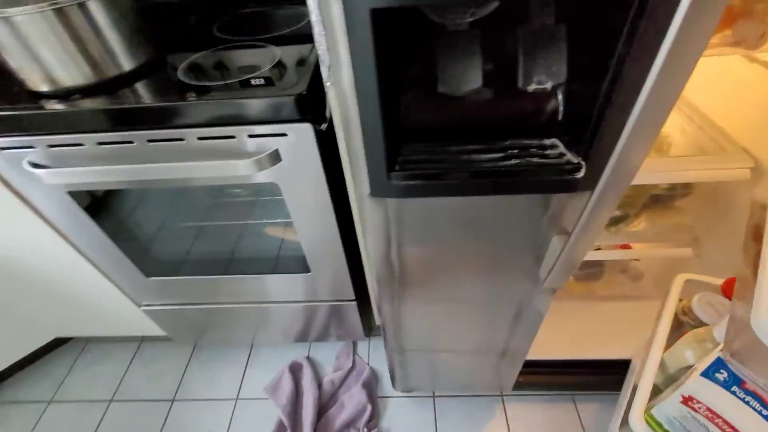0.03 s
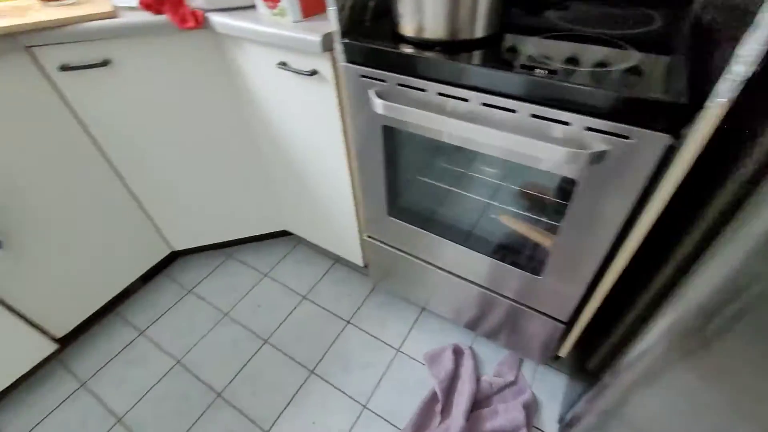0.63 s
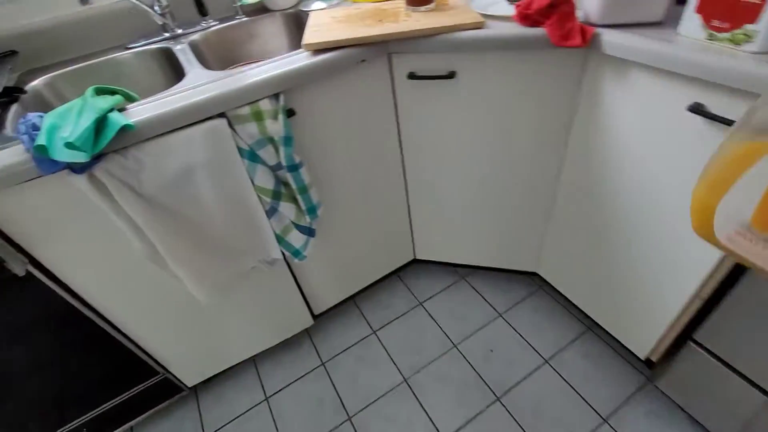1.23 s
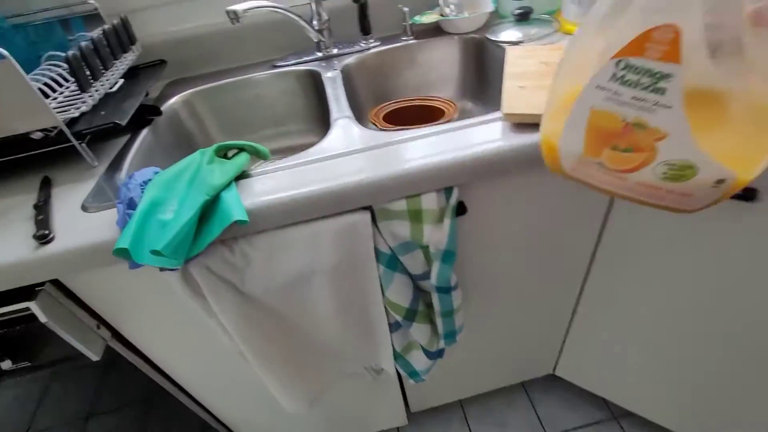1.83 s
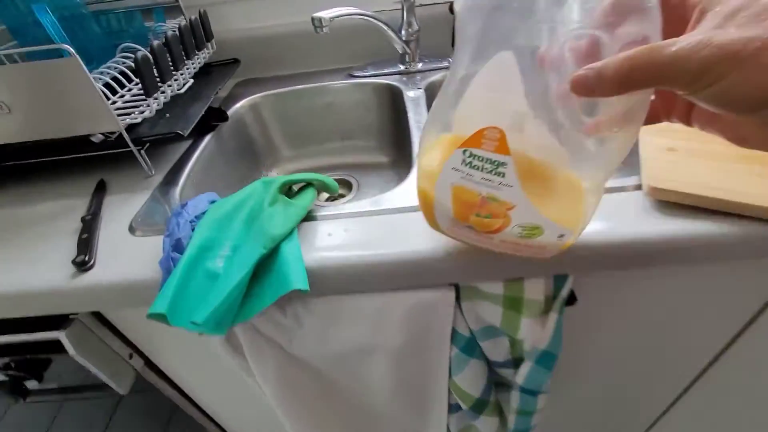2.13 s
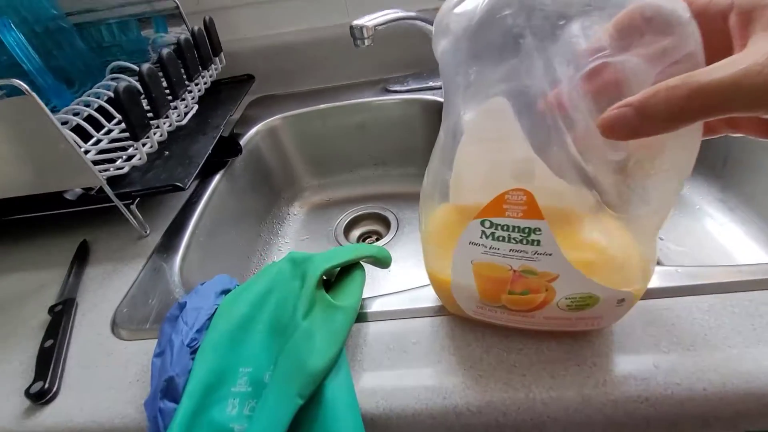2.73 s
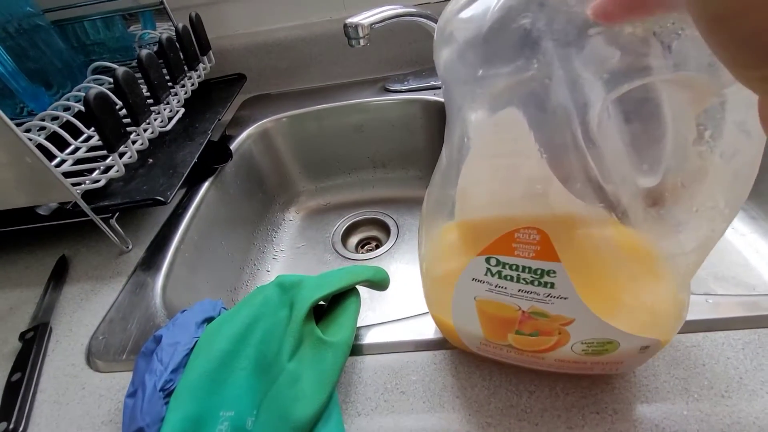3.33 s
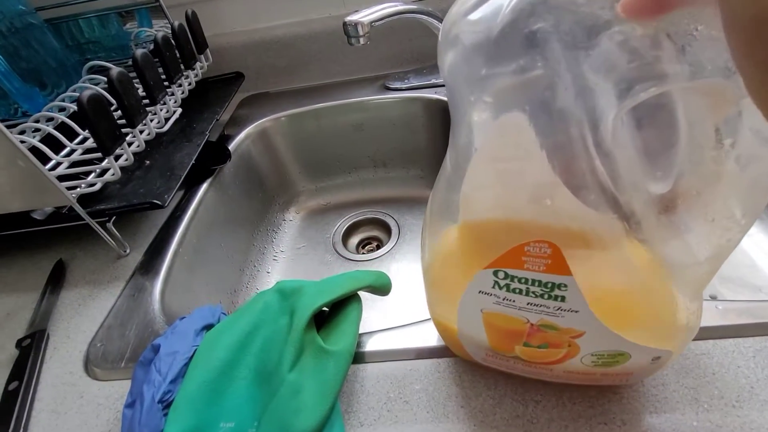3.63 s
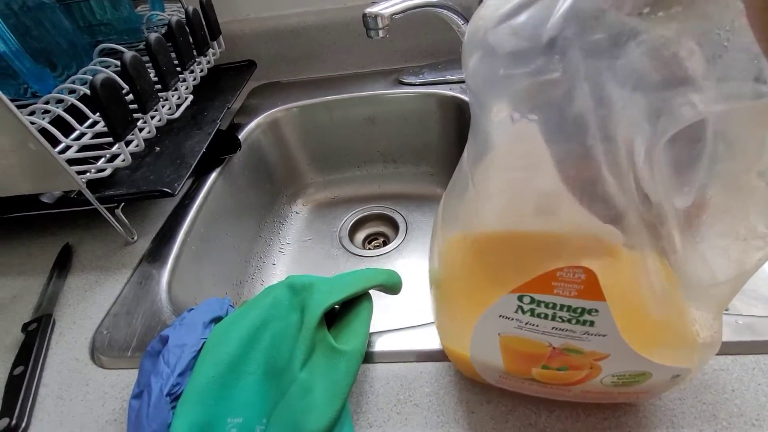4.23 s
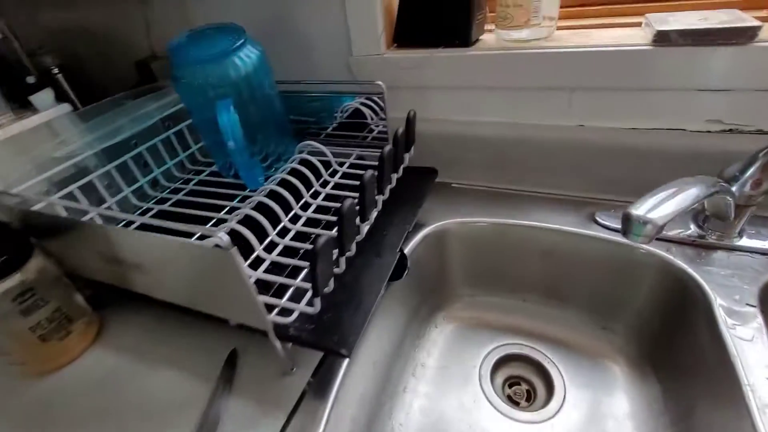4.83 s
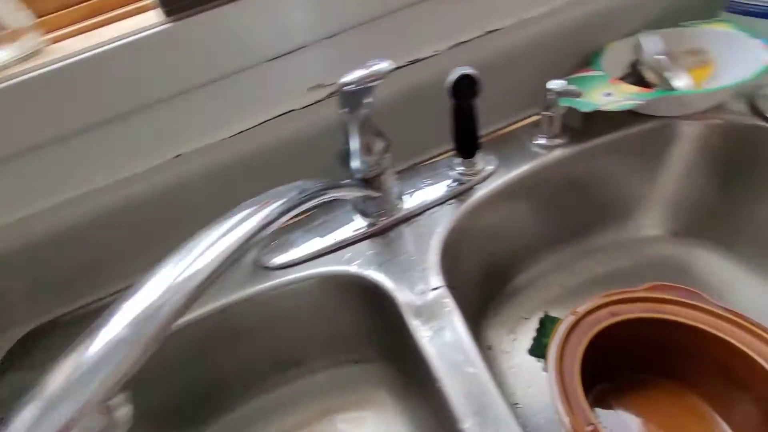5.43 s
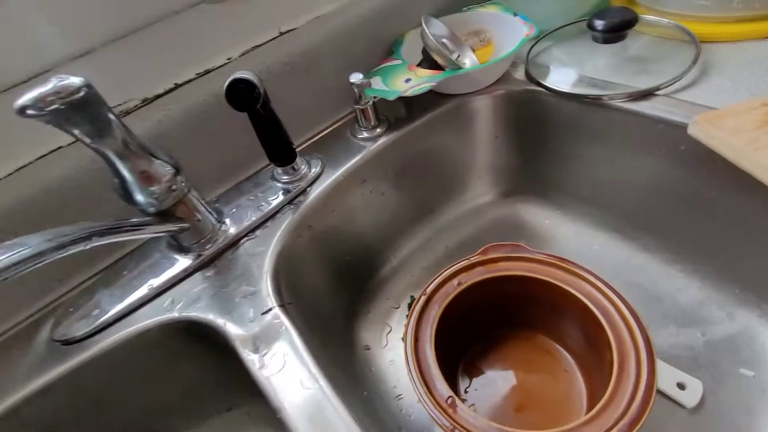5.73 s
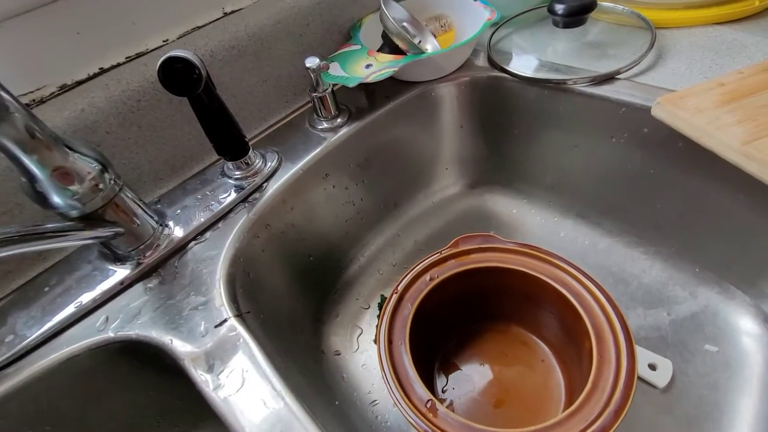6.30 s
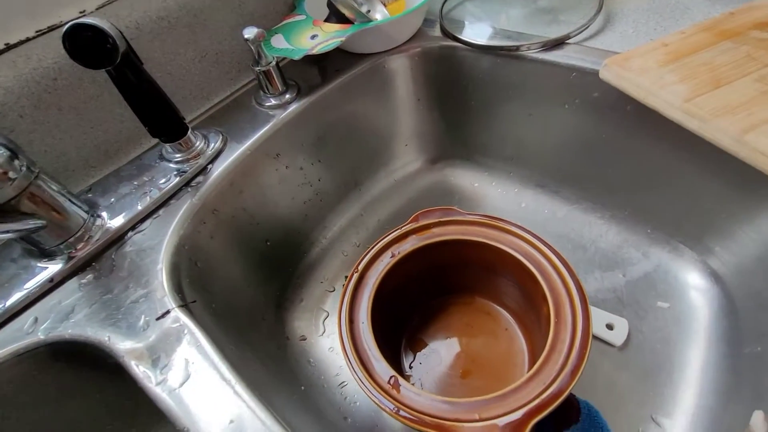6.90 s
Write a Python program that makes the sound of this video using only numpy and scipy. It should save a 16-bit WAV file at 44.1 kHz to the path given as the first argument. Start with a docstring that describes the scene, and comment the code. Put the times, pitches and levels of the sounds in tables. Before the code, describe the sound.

A refrigerator door thumps shut, then a plastic juice jug knocks hollowly onto a counter and a tap clunks aside.

```python
"""A faint hum and hiss fill a small tiled kitchen. Glass clinks in a moving refrigerator door, which
lands on its seal at 1.1 s: the cabinet booms and the shelves rattle on. From 1.7 s a plastic jug of
juice is carried to the sink, set down, slid and rocked, its walls ringing. From 4.7 s the tap is swung
aside and something light clacks. Each knock leaves things shaking. At 7 s the hand-held camera is
bumped and its shell rings hollow."""
import sys
import numpy as np
from scipy import signal
from scipy.fft import rfft, irfft, next_fast_len
from scipy.io import wavfile
from scipy.ndimage import map_coordinates

SR = 44100
rng = np.random.default_rng(int(sys.argv[2]) if len(sys.argv) > 2 else 0)


def to_wav(sig):
    """Store sig (one row per channel, or 1-D mono) as 16-bit WAV at the path in sys.argv[1].

    Samples outside -1..1 are clipped; the rate is SR.
    """
    pcm = np.clip(np.atleast_2d(sig), -1, 1) * 32767
    pcm = np.round(pcm).astype(np.int16)
    wavfile.write(sys.argv[1], SR, pcm.T)  # frames by channels


N = 311346
T = np.arange(SR // 2) / SR  # time within one event, s


def amp(db):
    """Decibels to gain."""
    return 10 ** (np.asarray(db) / 20)


def unit(x, size=None):
    """Scale to rms 1 over the first size samples."""
    return x / np.sqrt(np.mean(x[..., :size] ** 2) + 1e-20)


def along(points, hz):
    """Interpolate (Hz, value) points on a log axis."""
    point_hz, values = np.transpose(points)
    return np.interp(np.log(hz + 1), np.log(point_hz), values)


def curve(points):
    """Join (s, value) points with straight lines."""
    return np.interp(np.arange(N) / SR, *np.transpose(points))


def decay(t60_s):
    """Exponential fall, 60 dB in t60_s."""
    return np.exp(-np.log(1000) * T / t60_s)


def stroke(rise_s, t60_s):
    """Linear rise, then exponential fall."""
    return np.minimum(T / rise_s, 1) * np.exp(-np.log(1000) * np.maximum(T - rise_s, 0) / t60_s)


def sine(hz):
    """Sine tone, one event long."""
    return np.sin(2 * np.pi * hz * T)


def wobble(rate_hz, size=N):
    """Smooth random curve, rate_hz knots a second."""
    knots = rng.standard_normal(int(size * rate_hz / SR) + 4)
    return map_coordinates(knots, [np.arange(size) * rate_hz / SR])


# Each row: frequency in Hz, left-right correlation.
COHERENCE = [(100, 0.85), (300, 0.98), (600, 0.53), (1300, 0.76), (3000, 0.017), (10000, 0)]
def noise(spectrum, size=len(T), tilt_db_oct=0):
    """Coloured stereo noise of rms 1; the channels are alike in the bass, independent in the treble."""
    n_fft = next_fast_len(size)
    hz = np.fft.rfftfreq(n_fft, 1 / SR)
    angle = np.arccos(np.clip(along(COHERENCE, hz), -1, 1)) / 2
    gain = amp(along(spectrum, hz) + tilt_db_oct * np.log2(hz + 1))
    white = rfft(rng.standard_normal((2, n_fft)))
    mid, side = irfft(white * gain * [np.cos(angle), np.sin(angle)], n_fft)[:, :size]
    return unit(np.array([mid + side, mid - side]))


def ring(modes, scatter_db, detune):
    """Damped modes, with random scatter of strength and pitch at each strike."""
    hz, db, t60_s = np.transpose(modes)[:, :, None]
    strength, pitch = rng.standard_normal((2, len(modes), 1))
    sign = (-1) ** np.arange(len(modes))[:, None]
    return np.sum(sign * amp(db + scatter_db * strength) * decay(t60_s) * sine(hz * (1 + detune * pitch)), 0)


def add(out, start_s, sound, lag_ms=0, pan_db=0):
    """Mix in an event; lag_ms and pan_db are left minus right."""
    for channel, x, side in zip(out, np.broadcast_to(sound, (2, len(T))), (.5, -.5)):
        start = int(np.clip(round((start_s + side * lag_ms / 1000) * SR), 0, N - 1))
        channel[start:start + len(T)] += amp(side * pan_db) * x[:N - start]


def knocks(rows, modes, spectrum, noise_db, t60_s, tick_t60_s, trim_db, lag_ms, rise_s):
    """Contacts ring a body in four bands: weight sets the thump, hardness the clack and the tick."""
    out = np.zeros((2, N))
    bands = [(3, (52, 190)), (4, (180, 700)), (4, (700, 2200)), (6, (2200, 16000))]
    filters = [signal.butter(order, hz, 'bandpass', fs=SR, output='sos') for order, hz in bands]
    band_t60_s = [.9 * t60_s, .85 * t60_s, .65 * t60_s, tick_t60_s]
    for start_s, level_db, weight_db, hard_db, *_ in rows:
        tone = unit(ring(modes, scatter_db=1.5, detune=0.018) * decay(2.5 * t60_s), size=SR // 40)
        burst = amp(noise_db) * noise(spectrum)
        parts = [signal.sosfilt(sos, tone + burst * decay(t60)) for sos, t60 in zip(filters, band_t60_s)]
        band_db = np.add([weight_db, 0, hard_db, 0.77 * hard_db], trim_db)  # thump, body, clack, tick
        blow = sum(amp(db) * unit(x, size=SR // 40) for x, db in zip(parts, band_db))
        add(out, start_s, amp(level_db) * blow * (1 - decay(rise_s)), lag_ms)
    return out


# Each row: frequency in Hz, reverberation t60 in seconds.
ROOM_T60 = [(60, 0.39), (250, 0.47), (1000, 0.19), (4000, 0.32), (8000, 0.097), (15000, 0.033)]
def kitchen(dry, wet_db):
    """Tiles and cupboards reflect the sound, each frequency dying at its own rate."""
    hz, t, frames = signal.stft(noise([(60, -11), (250, -5), (16000, 7.5)]), SR, nperseg=256)
    fade = np.exp(-np.log(1000) * t / along(ROOM_T60, hz)[:, None])
    tail = signal.istft(frames * fade, SR, nperseg=256)[1]
    tail = np.pad(tail / np.linalg.norm(tail[0]), ((0, 0), (SR // 250, 0)))  # 4 ms pre-delay
    return dry + amp(wet_db) * signal.fftconvolve(dry, tail, axes=1)[:, :N]


# Each row: frequency in Hz, noise density in dB.
HUM_SPECTRUM = [(15, -43), (25, -18), (80, -19), (206, 5), (249, 4), (394, -22.5), (936, -20.5),
                (2160, -32), (2410, -31), (2760, -26.5), (3520, -33), (4870, -30.5), (6560, -25.5),
                (9320, -28), (16000, -26)]
def background():
    """Low appliance hum and a narrow band of high hiss."""
    hiss = noise([(3000, -37), (4200, -11), (4700, -5.5), (5200, -12.5), (6500, -29)], size=N)
    return amp(-73 + .6 * wobble(6.4)) * noise(HUM_SPECTRUM, size=N) + amp(-82) * hiss


# Each row: start in seconds, frequency in Hz, relative level in dB.
ARM_SWINGS = [(1.649, 43, -31), (4.86, 63.6, -50), (5.433, 60.8, -30.5), (5.642, 48, -54),
              (6.661, 62.5, -48.5)]
def lurches():
    """A swing of the arm heaves the air at the camera for a few slow cycles."""
    out = np.zeros((2, N))
    for start_s, hz, db in ARM_SWINGS:
        add(out, start_s, amp(db - 3.5) * sine(hz) * stroke(rise_s=0.023, t60_s=0.3), lag_ms=.2)
    return out


def shaking(rows):
    """Envelopes of the shaking after knocks: rumble follows their bass, stirring their level."""
    power = np.zeros((2, N))
    for start_s, db, weight_db, *_ in rows:
        rumble = amp(db + weight_db - 16.5) * stroke(rise_s=0.014, t60_s=.4)
        stir = amp(db - 16.5) * stroke(rise_s=0.014, t60_s=0.12)
        add(power, start_s, np.array([rumble, stir]) ** 2)
    return np.sqrt(power)


# Noises of moving about. Each row: frequency in Hz, density in dB.
RUMBLE_SPECTRUM = [(10, -33.5), (30, -11.5), (60, 8), (130, 13.5), (200, -1), (300, -36)]
SLOSH_SPECTRUM = [(130, -24.5), (230, 2), (320, 1.5), (480, -4.5), (750, -15.5), (1200, -12.5), (2000, -28),
                  (4000, -49.5)]
RUSTLE_SPECTRUM = [(700, 5), (1500, -4), (3000, -10), (7000, -7.5), (10000, -15), (16000, -16.5)]
# Each row: time in seconds, relative level in dB.
RUMBLE_LEVELS = [(0.0, -82.5), (0.84, -78), (1.16, -55), (2.04, -82), (2.63, -50), (2.79, -71.5),
                 (3.78, -72.5), (4.11, -52.5), (4.36, -74.5), (5.23, -66), (5.39, -49.5), (5.74, -60),
                 (6.49, -66.5), (7.06, -54.5)]
STIR_LEVELS = [(0.0, -77.5), (0.8, -75), (1.16, -33.5), (1.59, -54), (1.79, -50), (2.24, -64.5),
               (2.69, -62.5), (2.83, -69), (3.03, -68.5), (3.56, -62.5), (4.15, -62), (4.36, -68),
               (5.21, -66.5), (5.35, -53.5), (5.58, -70.5), (5.92, -51.5), (6.33, -80.5), (7.06, -63)]
# Each row: start in seconds, level in dB, length in seconds.
ARM_RUSTLES = [(0.73, -72, 0.2), (1.66, -67.5, 0.23), (2.2, -73.5, 0.4), (4.48, -68, 0.38),
               (4.91, -66, 0.162), (5.64, -69.5, 0.487), (6.66, -72.5, 0.23)]
def handling(knock_rows):
    """Moving about: the camera rumbles, juice and shelves stir, arm and grip rustle."""
    rumble_shake, stir_shake = shaking(knock_rows)
    rumble_gain = np.hypot(amp(curve(RUMBLE_LEVELS) + 1), rumble_shake)
    rumble = rumble_gain * amp(1.8 * wobble(32)) * noise(RUMBLE_SPECTRUM, size=N)
    stir_db = curve(STIR_LEVELS) - 2.5
    slosh = np.hypot(amp(stir_db), stir_shake) * amp(2.6 * wobble(30)) * noise(SLOSH_SPECTRUM, size=N)
    rustle_db = np.minimum(stir_db, -58.5) - 20
    rustle = amp(rustle_db + 1.3 * wobble(20)) * noise(RUSTLE_SPECTRUM, size=N)
    for start_s, db, length_s in ARM_RUSTLES:
        arch = np.sin(np.pi * np.minimum(T / length_s, 1))
        add(rustle, start_s, amp(db + 2 * wobble(86, size=len(T))) * arch * noise(RUSTLE_SPECTRUM))
    left, right = rumble + slosh + rustle
    return np.array([np.roll(left, round(.3 * SR / 1000)), right])  # left lags 0.3 ms


# Each row: frequency in Hz, noise density in dB.
SCRAPE_SPECTRUM = [(180, -52), (300, -11.5), (372, -49), (593, -0.5), (870, -14), (946, -5), (1530, -13.5),
                   (4160, -14.5), (4520, -16.5), (15200, -31), (16000, -31)]
# Each row: start in seconds, level in dB, rise and t60 in seconds, tilt in dB per octave.
SLIDING_CONTACTS = [(0.086, -63, .035, 0.19, 1), (2.149, -50, 0.002, 0.41, 7.5),
                    (2.768, -43, 0.033, 0.31, 0), (4.722, -59, 0.048, 0.21, -2),
                    (5.239, -51, 0.0275, 0.26, 1), (6.731, -73.5, 0.053, 0.25, 8),
                    (6.929, -62, 0.058, 0.44, 6.5)]
# Each row: start in seconds, level in dB, rise and t60 in seconds.
SOFT_MOVES = [(0.469, -56, 0.028, 0.14), (0.821, -53.5, .06, 0.27), (1.02, -41.5, .06, .3),
              (1.389, -46.5, 0.034, 0.2), (4.321, -56.5, 0.037, 0.22), (4.658, -54.5, 0.045, .22),
              (5.149, -48.5, 0.071, 0.29), (6.02, -59, 0.06, 0.63), (6.68, -67.5, .08, .5)]
def rubs():
    """Sliding contacts catch and slip in fine grains; softer movements only swell."""
    out = np.zeros((2, N))
    for start_s, db, rise_s, t60_s, tilt_db_oct in SLIDING_CONTACTS:
        grain = unit(amp(4.7 * wobble(500, size=len(T))))
        scrape = noise(SCRAPE_SPECTRUM, tilt_db_oct=tilt_db_oct)
        add(out, start_s, amp(db) * stroke(rise_s, t60_s) * grain * scrape)
    for start_s, db, rise_s, t60_s in SOFT_MOVES:
        add(out, start_s, amp(db) * stroke(rise_s, t60_s) * noise(SLOSH_SPECTRUM), lag_ms=0.45)
    return out


# Each row: frequency in Hz, level in dB, t60 in seconds.
CAMERA_MODES = [(120, -9, 0.084), (209, -4, 0.095), (353.3, -1, 0.16), (493, 0, 0.023), (623, -12, 0.03),
                (700, -36, 0.073), (906, -14.5, 0.075)]
def camera_bump():
    """A soft, close blow: one push and pull, then the shell rings and rattles briefly."""
    out = np.zeros((2, N))
    pulse_time = (T - .0046) / .0009
    push_pull = -pulse_time * np.exp(-pulse_time ** 2 / 2)
    add(out, 6.9822, amp(-15.5) * push_pull, lag_ms=.1, pan_db=-8.5)
    hollow = ring(CAMERA_MODES, scatter_db=1, detune=.004)
    add(out, 6.9865, amp(-23) * hollow * decay(0.54), lag_ms=0.24, pan_db=-1.5)
    shell = noise([(300, 3.5), (600, -2), (1050, -4), (1400, -16), (2000, -32), (3000, -54)])
    rattle = shell * (amp(-25.5) * decay(0.017) + amp(-39.5) * decay(0.19)) * (1 - decay(0.019))
    add(out, 6.9835, rattle, lag_ms=0.11, pan_db=-4)
    return out


# Each row: frequency in Hz, level in dB, t60 in seconds.
LIGHT_OBJECT_MODES = [(308, 3, 0.09), (420, -6, 0.09), (675, 5, 0.04), (1015, 0, .06), (1220, -7, 0.06),
                      (1780, -6, 0.032), (2040, -6, 0.02), (2865, -14, .04), (3700, -15, 0.03),
                      (4630, -25, .05), (5160, -25, .05)]
def clack():
    """Something hard and light is knocked right of the sink; it is too small to radiate bass."""
    out = np.zeros((2, N))
    body = amp(-36.5) * ring(LIGHT_OBJECT_MODES, scatter_db=.5, detune=0.002)
    crack = noise(SCRAPE_SPECTRUM) * (amp(-37.5) * decay(0.027) + amp(-54.5) * decay(0.098))
    low_cut = signal.butter(2, 330, 'highpass', fs=SR, output='sos')
    add(out, 4.7938, signal.sosfilt(low_cut, (body + crack) * (1 - decay(0.0012))), lag_ms=0.5, pan_db=-7.5)
    return out


# Contact noise of tap and jug. Each row: frequency in Hz, density in dB.
CONTACT_SPECTRUM = [(40, -14), (250, 3.5), (500, -8), (1100, -12), (2000, -15), (3200, -18), (5000, -19),
                    (8000, -27), (16000, -38)]
# Each row: frequency in Hz, level in dB, t60 in seconds.
SINK_MODES = [(63.4, -2.5, 0.75), (113, -2.5, 0.26), (158.7, -3, 0.62), (238, 2.5, 0.145), (345.8, 0, 0.18),
              (441, -11, 0.75), (726, -15.5, 0.15), (971, -5, 0.088), (1295, -9, 0.2), (1870, -35, .06)]
# Each row: start in seconds, then relative level, bass weight and hardness in dB.
TAP_HITS = [(4.654, -57.5, 4.5, -15), (5.234, -34, 6, 1), (5.257, -37, 6, -13), (5.436, -38.5, 1.5, 7),
            (5.652, -66, 18.5, -13), (5.876, -50, -10.5, -11), (5.91, -47.5, -11, -1)]
def tap_knocks():
    """The tap knocks as it is swung aside and rings the sink."""
    return knocks(TAP_HITS, SINK_MODES, CONTACT_SPECTRUM, noise_db=0.5, t60_s=0.21, tick_t60_s=0.074,
                  trim_db=(-3, -2, -23, -32), lag_ms=0.09, rise_s=0.0086)


# Each row: frequency in Hz, noise density in dB.
TICK_SPECTRUM = [(1500, -46), (4000, -16), (7000, -2), (9000, -9.5), (13000, -2), (16000, 5.5)]
# Each row: start in seconds, relative level in dB.
FLEX_TICKS = [(3.317, -61), (3.4305, -54.5), (3.432, -45.5), (3.471, -60.5), (3.496, -50), (3.547, -61.5),
              (3.5556, -52), (4.189, -52)]
def jug_ticks():
    """The jug's plastic ticks dryly as it flexes."""
    out = np.zeros((2, N))
    for start_s, db in FLEX_TICKS:
        add(out, start_s, amp(db + 7) * noise(TICK_SPECTRUM) * decay(0.0097), pan_db=6)
    return out


# Each row: frequency in Hz, level in dB, t60 in seconds.
JUG_MODES = [(60.5, 6, 0.42), (116.5, 3.5, 0.15), (155, -3, 0.41), (226.5, -2, 0.34), (311.6, 2.5, 0.086),
             (447, -3, 0.29), (606.5, -12, 0.11), (683, -6, 0.043), (1148, -3, 0.045), (1930, -29.5, 0.016),
             (2060, -54, .06)]
# Each row: start in seconds, relative level, bass weight and hardness in dB, wall note in Hz,
# note level against the blow in dB.
JUG_HITS = [(1.675, -42.5, -16, 11, 728, 13), (1.77, -56, 0, 15.5, 283, -11),
            (1.832, -39.5, -20, -8, 380, 4), (2.149, -49, -14, 15, 220, -1.5),
            (2.282, -50, -10, 9.5, 275, 5), (2.425, -32, -0.5, -1.5, 215, -7),
            (2.458, -28.5, -3.5, 4.5, 1160, 1.5), (2.531, -36.5, -1.5, 2, 403, -1.5),
            (2.605, -52.5, -4, -21.5, 232, 13.5), (2.73, -41, 0, -3, 312, -0.5),
            (2.773, -37, -22, -0.5, 828, 2.5), (2.896, -51.5, -17, 0, 339, 13.5),
            (3.018, -51.5, -4, -1, 423, -5), (3.057, -49, -5, -2.5, 216, 5), (3.092, -34, -8, 0, 212, 4),
            (3.111, -31.5, -4, -4.5, 460, -1), (3.139, -40.5, -1.5, -1.5, 115, 3.5),
            (3.315, -50, -2, 3, 331, 6), (3.931, -39, -16, 4, 354, -3.5), (4.022, -37, 2, 0, 227, 0),
            (4.045, -33.5, 1, 2.5, 220.4, -0.5), (4.192, -48, -4.5, 2, 306, 0)]
def jug_knocks():
    """Each knock rings the jug and one wall, whose pitch shifts with the grip and the juice's tilt."""
    out = knocks(JUG_HITS, JUG_MODES, CONTACT_SPECTRUM, noise_db=-1, t60_s=0.24, tick_t60_s=0.106,
                 trim_db=(-1, -4.5, -17.5, -26), lag_ms=0.088, rise_s=0.0099)
    for start_s, db, _, _, hz, note_db in JUG_HITS:
        note = sine(hz) * decay(40 / hz) * (1 - decay(0.0058))  # t60 of 40 cycles
        add(out, start_s, amp(db + note_db) * note)
    return out


def clink():
    """Two glass things brush together in the moving door."""
    out = np.zeros((2, N))
    glass = ring([(5815, 2, 0.11), (7500, -1, 0.047)], scatter_db=4, detune=0)
    add(out, .478, amp(-50.5) * glass * np.minimum(T / 0.014, 1) ** 2)
    return out


# Each row: frequency in Hz, level in dB, t60 in seconds.
FRIDGE_MODES = [(64.6, 1, 0.065), (290, 3.5, 0.13), (338, -15, 0.88), (374, -23, 0.17), (450, -4.5, 0.12),
                (573, -21, 0.37), (665, -28, 0.43), (980, -25, 0.51), (875, -29.5, 0.19),
                (990, -24.5, 0.47), (1020, -15.5, 0.063), (1250, -30, 0.6), (1244, -27, 0.75),
                (1410, -39, 0.4), (1550, -37.5, 0.3), (1830, -31.5, 0.29), (2100, -47.5, 0.57),
                (2110, -40.5, 0.33), (2830, -38, 0.42), (2850, -42, 0.31)]
# Each row: frequency in Hz, noise density in dB.
PANEL_SPECTRUM = [(40, -2), (100, -2.5), (170, -5.5), (280, 4.5), (700, 2), (1050, -4.5), (1500, -10.5),
                  (3000, -27.5), (7000, -41), (16000, -54.5)]
# Each row: start in seconds, then relative level, bass weight and hardness in dB.
DOOR_HITS = [(0.877, -50, -18.5, 7), (0.966, -31.5, -12, -4.5), (0.99, -33.5, -6.5, -9.5),
             (1.386, -52, -2, 10), (1.405, -42.5, -1.5, 3), (1.423, -37.5, -22, -33),
             (1.455, -40.5, -16, -17)]
def door_knocks():
    """Things knock in the door and ring the refrigerator."""
    return knocks(DOOR_HITS, FRIDGE_MODES, PANEL_SPECTRUM, noise_db=3.5, t60_s=.19, tick_t60_s=.12,
                  trim_db=(-4.5, -3.5, -9, -26.5), lag_ms=0.4, rise_s=0.004)


# Each row: frequency in Hz, noise density in dB.
CRACK_SPECTRUM = [(300, -18.5), (1500, 6), (3000, -13), (4200, -1.5), (7500, 2), (9500, -5), (16000, -8.5)]
def door_slam():
    """The plastic edge touches, the gasket squeaks, the door lands: cabinet and shelves shake."""
    out = np.zeros((2, N))
    land_s = 1.1228
    edge = noise([(900, -21), (1500, 6), (3000, -8), (5000, -17.5), (12000, -32)])
    add(out, 1.0275, edge * (amp(-43.5) * decay(0.024) + amp(-48.5) * decay(0.55)), lag_ms=.3)
    squeak = sine(1780) * decay(0.013) * (1 - decay(0.035))
    add(out, 1.111, amp(-12.5) * squeak, lag_ms=0.13)
    boom = sine(63.5) * decay(.42) * np.exp(-(T / .085) ** 4)  # the seal grips and stops the swing
    add(out, 1.1235, amp(-16) * boom, lag_ms=0.49, pan_db=-2)
    cabinet = unit(ring(FRIDGE_MODES[1:], scatter_db=-3.5, detune=.002), size=SR // 20)
    add(out, land_s, amp(-29) * cabinet * decay(.7), lag_ms=0.53, pan_db=2)
    blow = amp(-6.5) * sine(700) * decay(.014)
    shelves = amp(-15.5) * noise(PANEL_SPECTRUM) * decay(0.16) * (1 - decay(0.0044))
    crack = noise(CRACK_SPECTRUM) * (amp(-29) * decay(0.023) + amp(-45) * decay(0.46))
    add(out, land_s, blow + shelves + crack, lag_ms=0.36, pan_db=-1.5)
    face_push = sine(108) * decay(0.072)
    add(out, land_s, amp(-16.5) * face_push, lag_ms=0.57, pan_db=-2)
    rebound = noise(PANEL_SPECTRUM) * decay(0.12)
    add(out, 1.166, amp(-24) * rebound, lag_ms=0.34)
    bottles = noise(SLOSH_SPECTRUM) * stroke(.02, .7)
    add(out, 1.13, amp(-40) * bottles)
    add(out, 1.15, amp(-46) * noise(RUMBLE_SPECTRUM) * stroke(0.02, 0.2))
    return out


def scene():
    """All sources, the far ones with more room."""
    door, jug, tap = door_knocks(), jug_knocks(), tap_knocks()
    far = kitchen(door + rubs() + door_slam(), wet_db=-3)
    near = kitchen(jug + jug_ticks() + tap + clack() + clink() + camera_bump(), wet_db=-7.5)
    return far + near + handling(DOOR_HITS + JUG_HITS + TAP_HITS) + lurches() + background()


# Each row: frequency in Hz, left minus right in dB.
PORT_BALANCE = [(60, -2), (400, -4), (1200, -2), (3000, 3), (12000, 3)]
def record(dry):
    """The two microphone ports differ in colour and shed the deepest bass and the top treble."""
    low_cut_hz, top_hz = 18, 15900
    n_fft = next_fast_len(N + SR // 2)
    hz = np.fft.rfftfreq(n_fft, 1 / SR)
    colour = amp(along(PORT_BALANCE, hz) * np.array([[.5], [-.5]]))
    low_cut = 1j * hz / (1j * hz + low_cut_hz)
    return irfft(rfft(dry, n_fft) * colour * low_cut * (hz < top_hz), n_fft)[:, :N]


dry = scene()
out = record(dry)
to_wav(out)
```